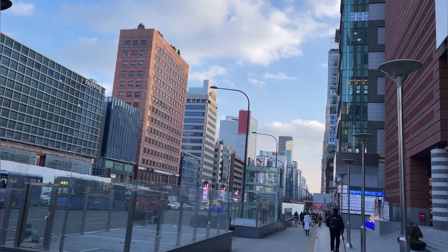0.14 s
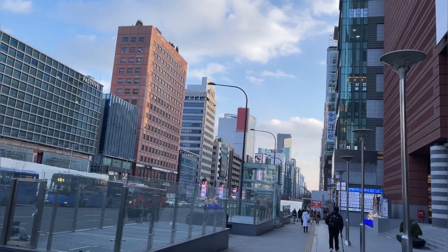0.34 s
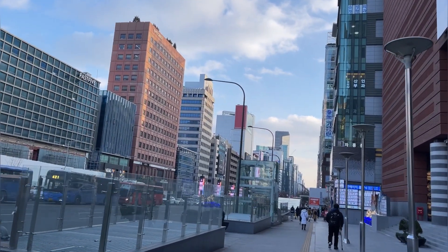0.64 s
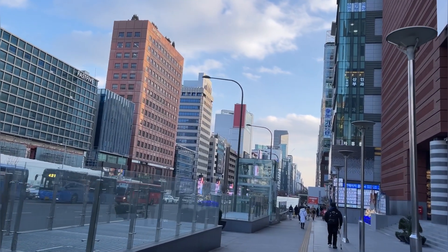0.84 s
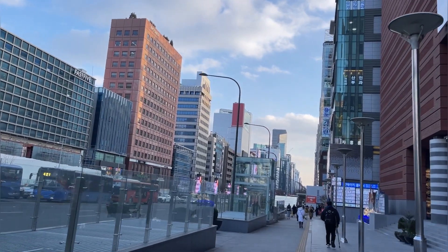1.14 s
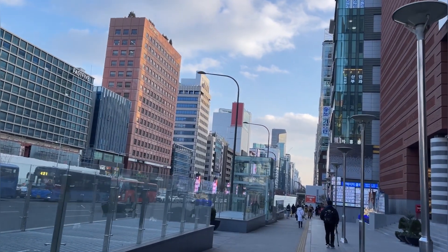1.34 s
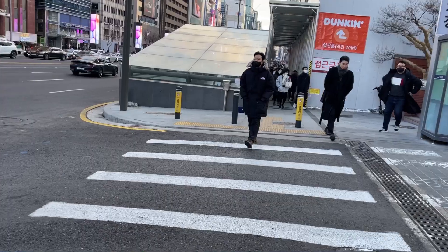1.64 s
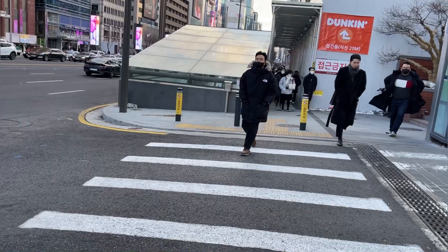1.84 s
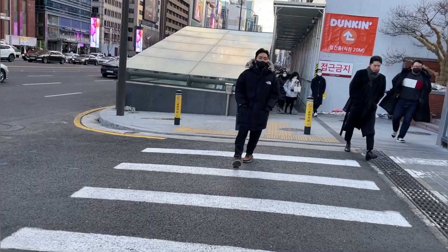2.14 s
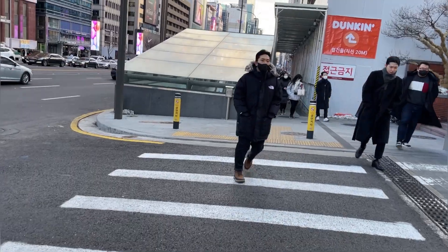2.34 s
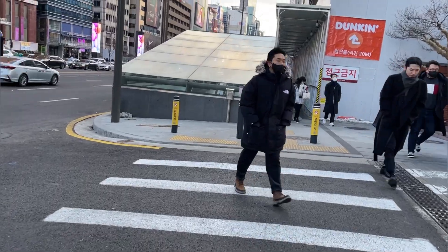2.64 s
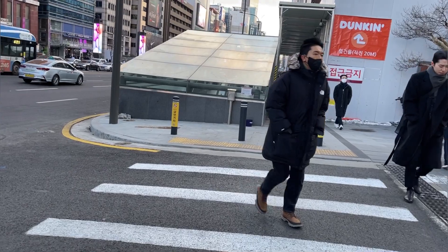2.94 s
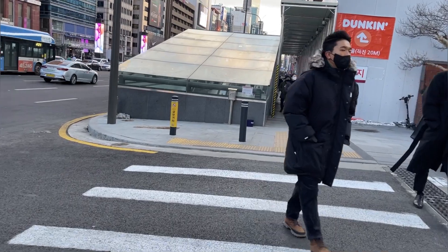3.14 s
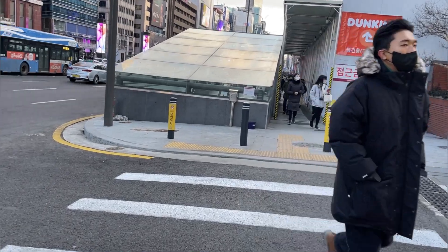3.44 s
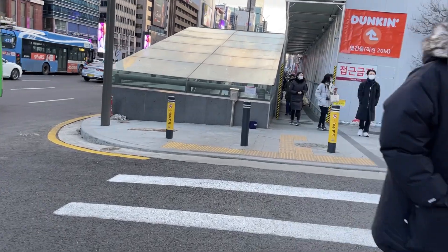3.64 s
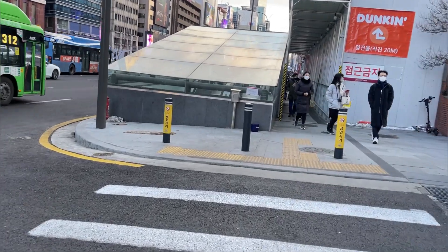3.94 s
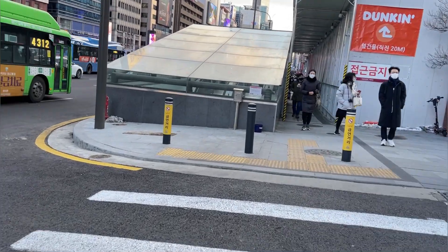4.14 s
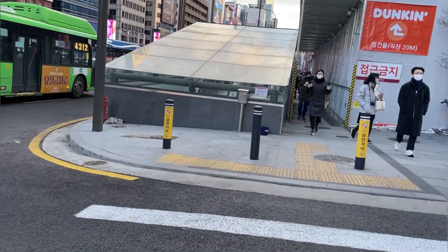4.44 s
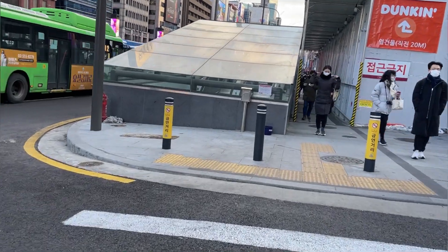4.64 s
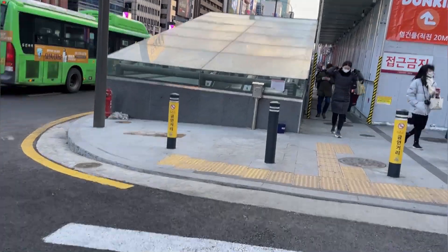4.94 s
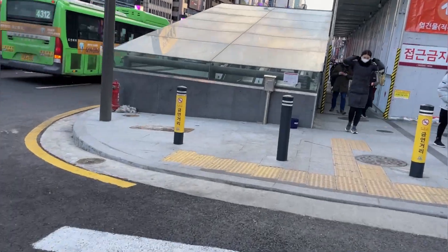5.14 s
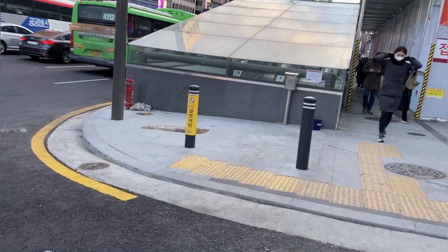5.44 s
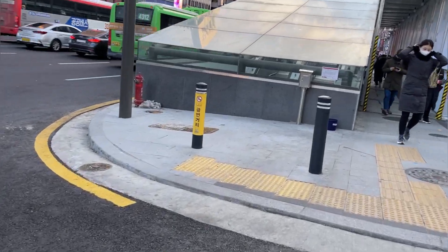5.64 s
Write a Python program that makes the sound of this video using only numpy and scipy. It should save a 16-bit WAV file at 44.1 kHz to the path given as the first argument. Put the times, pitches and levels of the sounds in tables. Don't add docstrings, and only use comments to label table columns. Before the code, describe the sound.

Handheld phone stereo with no wind protection. First, dense wind popping and low buffeting over a blurred traffic wash, with one tiny lull. A hard cut leads to a quieter street corner, where heavy low wind thumps come before a bus swells on the left, its whine sagging in pitch as it goes. A faint metal clink follows, and another car approaches at the end.

```python
import sys
import numpy as np
from scipy import signal
from scipy.fft import rfft, irfft, next_fast_len
from scipy.io import wavfile
from scipy.ndimage import uniform_filter1d

SR = 44100
rng = np.random.default_rng(int(sys.argv[2]) if len(sys.argv) > 2 else 0)


def digitize_waveform(pressure):
    field = np.atleast_2d(pressure).T
    bounded = np.clip(field, -1, 1)
    quanta = np.round(bounded * 32767).astype(np.int16)
    wavfile.write(sys.argv[1], SR, quanta)


def convert_level_to_amplitude(level_db):
    exponent = np.asarray(level_db, float) / 20
    return 10 ** exponent


N = 255780
CHANGE_S = 1.5686
PAD = 1024
SIZE = next_fast_len(N + 2 * PAD)
HZ = np.fft.rfftfreq(SIZE, 1 / SR)


def evened(x):
    return x / np.sqrt(np.mean(abs(x) ** 2) + 1e-20)


def bell(t, s, half):
    return np.exp(-((t - s) / half) ** 2)


def read(points, hz):
    f, value = np.transpose(points)
    return np.interp(np.log(hz + 1), np.log(f + 1), value)


def column(rows, index, t):
    return np.interp(t, np.array(rows)[:, 0], np.array(rows)[:, index])


def spectrum(x):
    padded = np.pad(np.atleast_2d(x), ((0, 0), (PAD, PAD)), "reflect")
    return rfft(padded * signal.windows.tukey(N + 2 * PAD, 2 * PAD / (N + 2 * PAD)), SIZE)


def waveform(z):
    return irfft(z, SIZE)[:, PAD:PAD + N]


def wash(colour, level_db, patchy_db, flicker_db, size, pitch=1, count=N):
    hop = size // 4
    frames, hz = count // hop + 5, np.fft.rfftfreq(size, 1 / SR)
    t = np.arange(frames) * hop / SR
    a, b, c, d, patches = rng.standard_normal((frames, len(hz), 5)).T
    patches = uniform_filter1d(patches, size=size // 100, axis=0)
    patches = evened(uniform_filter1d(patches, size=12000 // size, axis=1))
    flicker = evened(uniform_filter1d(rng.standard_normal(frames), size=3))
    pitch_now = np.interp(t, np.arange(N) / SR, pitch * np.ones(N))
    shape = convert_level_to_amplitude(read(colour, hz[:, None] / pitch_now))
    z = np.array([a + 1j * b, c + 1j * d]) * shape * convert_level_to_amplitude(patchy_db * patches + flicker_db * flicker)
    noise = evened(signal.istft(z, nperseg=size, noverlap=size - hop)[1][:, :count])
    return np.pad(noise, ((0, 0), (0, N - count))) * convert_level_to_amplitude(level_db)


def tone(rows, t, waver, throb_db=0):
    fade_s = 0.011
    wobble = evened(signal.lfilter([1], [1, -.9995], rng.standard_normal(N)))
    throb = uniform_filter1d(rng.standard_normal(N), size=1500)
    throb = evened(uniform_filter1d(throb, size=1500))
    turns = np.cumsum(column(rows, 1, t) * (1 + waver * wobble)) / SR
    edge = np.clip(np.minimum(t - rows[0][0], rows[-1][0] + fade_s - t) / fade_s, 0, 1)
    level = np.sqrt(2) * convert_level_to_amplitude(column(rows, 2, t) + throb_db * throb)
    return level * edge * np.sin(2 * np.pi * turns)


# (frequency [Hz], left leads by [radians])
BODY_LEAD = [(7500, 1.), (8550, 0), (10080, -np.pi), (11700, -2 * np.pi)]
# (frequency [Hz], likeness [0-1])
BODY_SAME = [(8300, .99), (10000, .998)]
# (frequency [Hz], share [0-1])
SHADOWED = [(60, 0), (400, 1), (6000, 1), (8500, 0)]


def ports(a, b, lead, same, left_db):
    def curve(table):
        return np.interp(HZ, *np.transpose(table))

    whole_turns = 2 * np.pi * round(lead[-1][1] / (2 * np.pi))
    turn = curve(lead + [(hz, angle + whole_turns) for hz, angle in BODY_LEAD])
    like = np.clip(curve(same + BODY_SAME), 0, 1)
    own, other = spectrum([a, b])
    right = like * own * np.exp(-1j * turn) + np.sqrt(1 - like ** 2) * other
    both = np.array([own, right])
    shade = convert_level_to_amplitude(np.outer([.5, -.5], left_db)) - 1
    return waveform(both) + shade * waveform(both * curve(SHADOWED))


# (time [s], level [dB])
GUST = [
    (0, -27),
    (.11, -34.5),
    (.27, -23.5),
    (.5, -22.5),
    (.7, -21),
    (.95, -28),
    (1.15, -19.5),
    (1.32, -22),
    (1.5, -26),
]
# (time [s], rattle level [dB], crackle relative to rattle [dB], half length [s])
POPS = [(0.206, -27, -13, .0022), (0.256, -14, -10, 0.0051), (0.272, -15.5, -15, 0.0056),
        (2.594, -17, -24, 0.0032), (0.36, -14, -38, 0.0071), (0.448, -10.5, -36, 0.0035),
        (0.502, -4, -29, 0.0027), (0.543, -7, -26, 0.002), (0.555, -21, -22, 0.0024),
        (0.485, -18, -18, 0.015), (0.645, -12, -23, 0.0045), (0.658, -3, -16.5, 0.0027),
        (0.684, -17, -8, .0019), (0.698, -8.5, -14.5, 0.0016), (0.745, -10, -0.8, 0.0071),
        (0.773, -17.5, -15, 0.0055), (0.811, -22, -14, 0.0022), (0.912, -14, -32, 0.0081),
        (.935, -12.5, -9, 0.0045), (0.957, -18, -13.5, 0.0082), (1.042, -8, -21, 0.0031),
        (1.063, -13, -40, 0.0083), (1.109, -24, -10, 0.0016), (1.232, -18, -16, 0.011),
        (1.268, -17, -20, 0.0061), (1.316, -16.5, -22, 0.017), (1.381, -21, -15, 0.002),
        (1.404, -8, -34, 0.0013), (1.421, -16.5, -36, 0.0066), (1.519, -16, -38, 0.0064)]
# (time [s], level [dB], half length [s])
THUDS = [(0.01, -19, 0.0051), (0.612, -27, 0.003), (1.344, -27, 0.0043), (2.753, -20, .008),
         (0.18, -16.5, 0.0036), (0.296, -12, 0.0017), (0.388, -14.5, 0.0066), (0.419, -18, 0.0041),
         (0.662, -7, 0.0048), (.797, -11, 0.003), (1.132, -14, 0.0083), (1.209, -17, 0.0057),
         (1.447, -13, 0.0071), (2.416, -7.5, 0.0068), (2.593, -4.5, 0.0042), (2.636, -6, 0.0063),
         (2.672, -2.5, 0.0058), (2.698, -4.5, 0.0056), (2.725, -6, .007), (2.768, -4.5, 0.0041),
         (2.797, -13, 0.0063), (1.065, -16, 0.0053), (0.333, -18, 0.0047)]


def eddies(t):
    rattle, body, crackle, lean = np.zeros((4, N))
    when, size = rng.random(40) * (CHANGE_S - .25) + .2, rng.standard_normal(40)
    small = [(s, column(GUST, 1, s) - 4.5 + 4 * z, -18, 0.0029) for s, z in zip(when, size)]
    hits = [(s, db, -20 + 0.96 * (db + 16.5), db + up, half) for s, db, up, half in small + POPS]
    hits += [(s, db - 20, db, -99, half) for s, db, half in THUDS]
    for (s, db, body_db, crackle_db, half), z in zip(hits, rng.standard_normal(len(hits))):
        near = slice(round(max(s - .04, 0) * SR), round((s + .04) * SR))
        now = t[near]
        core, skirt = bell(now, s - .0012, 0.86 * half), bell(now, s + 0.0025, 2.8 * half)
        rattle[near] += convert_level_to_amplitude(db) * (core + 0.22 * skirt)
        body[near] += convert_level_to_amplitude(body_db) * bell(now, s - .0012, 1.4 * half)
        crackle[near] += max(convert_level_to_amplitude(crackle_db) - convert_level_to_amplitude(-62), 0) * bell(now, s - .001, 0.75 * half)
        lean_db = 5.5 + 0.41 * (db + 20.5) + 2 * z
        lean[near] = np.where(abs(now - s) < 3 * half, lean_db, lean[near])
    return rattle, body, crackle, lean


def smear(x, colour, lag_cycles):
    hz = np.fft.rfftfreq(N, 1 / SR)
    response = convert_level_to_amplitude(read(colour, hz)) * np.exp(-2j * np.pi * lag_cycles * np.log(hz + 30))
    return irfft(rfft(x) * response / np.sqrt(np.mean(abs(response) ** 2)), N)


# (time [s], level [dB], brightness relative to level [dB])
JUMPS = [(0.204, -24, -17), (0.238, -19, -16), (0.252, -12, -19), (0.261, -15, -11), (0.269, -16, -16),
         (0.278, -14, -17), (0.296, -27, -19), (0.328, -14, -23), (0.354, -12, -24), (0.362, -11, -25),
         (0.423, -17, -29), (0.449, -14, -24), (0.487, -12, -22), (0.499, -8, -17), (0.528, -10, -23),
         (0.541, -10, -24), (0.558, -16, -26), (0.579, -26, -19), (0.601, -19, -24), (0.635, -13, -23),
         (0.647, -9, -16), (0.655, -8, -17), (0.679, -22, -17), (0.687, -19, -17), (0.696, -16, -13),
         (0.738, -6, -12), (0.743, -9, -15), (0.748, -7, -13), (0.765, -19, -16), (0.809, -23, -15),
         (0.892, -20, -18), (0.908, -14.5, -10), (0.934, -5.5, -12.5), (0.952, -18, -18), (1.041, -13, -20),
         (1.062, -17, -32), (1.107, -15, -23), (1.151, -24, -17), (1.175, -26, -15), (1.205, -19, -17),
         (1.227, -13, -18), (1.244, -16, -21), (1.267, -19, -25), (1.289, -17, -12.5), (1.317, -14, -20),
         (1.338, -20, -19), (1.351, -17, -24), (1.379, -22, -21), (1.404, -11, -28), (1.415, -17, -21),
         (1.444, -17, -16), (1.512, -23, -23), (1.517, -13, -23), (1.541, -18, -19)]
# (time [s], level [dB])
CRACK = (.7425, -14)
# (frequency [Hz], level [dB])
BODY = [(90, 3), (180, 13), (300, 12.5), (480, 7), (900, -39)]
RATTLE = [(250, 1), (600, 8), (1000, 1.5), (1600, -7), (2500, -32), (3500, -51), (8000, -88)]
CRACKLE = [(800, 11), (2200, 12), (3500, -2), (5500, -28), (9000, -43)]
SNAP = [(2200, -1.5), (4000, 7), (5500, -6), (8000, -16), (12000, -12)]


def wind_pops(rattle, body, crackle):
    signs = rng.choice([-1., 1.], (2, N)) * convert_level_to_amplitude(4.7 * rng.standard_normal((2, N)))

    def spray(share):
        x = evened(signs * (rng.random((2, N)) < share))
        return x / np.sqrt(0.2 + abs(uniform_filter1d(x ** 2, size=260)))

    dense, sparse = spray(.06), spray(.025)
    snap = crackle ** 2 * sparse
    rattle, body, crackle = rattle * dense, body * dense, crackle * sparse
    directions = np.outer(rng.choice([-1., 1.], len(JUMPS)), [1, .4])
    for (s, db, up), sign in zip(JUMPS, directions):
        at = round(s * SR)
        rattle[:, at] += sign * convert_level_to_amplitude(db + 13)
        crackle[:, at] += sign * convert_level_to_amplitude(db + up + 15)
        body[:, at] += sign * convert_level_to_amplitude(db + 13)
    crack_s, crack_db = CRACK
    snap[0, round(crack_s * SR)] += convert_level_to_amplitude(crack_db)
    pops = smear(rattle, RATTLE, 1.05) * convert_level_to_amplitude(-3.0)
    pops += smear(body, BODY, 1.1) * convert_level_to_amplitude(-4.5)
    pops += smear(crackle, CRACKLE, 1.05) * convert_level_to_amplitude(1.0)
    return pops + smear(snap, SNAP, 1.2) * convert_level_to_amplitude(1.0)


# (time [s], level [dB], frequency [Hz])
PUSHES = [(0.095, -17.5, 96), (.275, -12, 66.6), (0.347, -9, 110), (0.392, -11, 65), (.509, -10.5, 98),
          (0.558, -13, 74), (.67, -2.5, 75.5), (.691, -6.5, 124), (.786, -7, 75), (.813, -12.5, 72.4),
          (0.974, -11.5, 82.5), (1.052, -12.5, 80), (1.134, -13.5, 71), (1.242, -15, 98), (1.297, -16, 81),
          (1.324, -13, 176), (1.411, -10, 86), (1.468, -8, 80), (1.737, -13, 102), (1.851, -16, 86.5),
          (2.158, -13.5, 86), (2.252, -11.5, 69.6), (2.276, -7, 97), (2.325, -7, 167), (2.382, -4, 70.24),
          (2.454, -11.5, 75.4), (2.527, -6.5, 64), (2.589, -1, 92), (2.639, -5, 100), (2.7, -6.5, 143)]


def air_pushes(t):
    push = np.zeros(N)
    for (s, db, hz), start in zip(PUSHES, rng.random(len(PUSHES))):
        near = slice(round((s - .05) * SR), round((s + .05) * SR))
        cycles = (t[near] - s) * hz
        swing = np.sin(2 * np.pi * (cycles - 0.13 * cycles ** 2 + start))
        push[near] += convert_level_to_amplitude(db) * bell(cycles, 0, 0.77) * swing
    return np.outer([1, .3], push) * convert_level_to_amplitude(-0.3)


# (frequency [Hz], level [dB])
THUMP = [(25, -15), (50, 13), (90, 4), (160, -2), (300, -9), (800, -69)]
POP_COLOUR = [(100, 8), (300, 10), (600, 9.5), (1200, -5), (2000, -16.5), (3500, -32)]


def buffeting(t):
    gust_db, before = column(GUST, 1, t), round(CHANGE_S * SR)
    rumble = wash(THUMP, gust_db, 1.6, 2.3, size=1024, count=before)
    flutter_db = -31 + 0.61 * (gust_db + 27.5)
    return rumble + wash(POP_COLOUR, flutter_db, 0.7, 7.5, size=256, count=before)


# (time [s], frequency [Hz], level [dB rms])
HOWL = [
    (2.5, 77, -22),
    (2.54, 83.9, -19.5),
    (2.6, 99.6, -16),
    (2.64, 110.9, -18.5),
    (2.7, 127.8, -19),
    (2.76, 143.6, -24),
    (2.81, 155, -27),
]


def howl(t):
    octave = [(s, 2 * hz, db) for s, hz, db in HOWL]
    return tone(HOWL, t, 0.0095, throb_db=2.5) + tone(octave, t, 0.0119, throb_db=3.0)


# (time [s], half length [s])
LULL = (.858, .028)
# (frequency [Hz], left leads by [radians])
WIND_LEAD = [(0, 0), (1200, -1.3), (1700, 0), (3000, .9), (6500, .3)]
# (frequency [Hz], likeness [0-1])
WIND_SAME = [(0, 0.53), (600, 0.45), (1400, 0.65), (2800, 0.26), (4300, 0.53), (7000, 0.26)]


def wind(t):
    rattle, body, crackle, lean = eddies(t)
    gusts = wind_pops(rattle, body, crackle) + air_pushes(t) + buffeting(t)
    gusts *= 1 - .95 * bell(t, *LULL)
    gusts[0] += howl(t)
    apart = ports(*gusts, WIND_LEAD, WIND_SAME, 0.61 * uniform_filter1d(lean, size=200))
    return np.where(t < CHANGE_S, apart, gusts[0])


def ducking(loud):
    duck_from_db, duck_share, recover_db_per_s = -16, 0.93, 19
    power_db = 10 * np.log10(abs(uniform_filter1d((loud ** 2).mean(0), size=2000)) + 1e-12)
    rise = np.arange(N) * recover_db_per_s / SR
    held_db = np.maximum.accumulate(power_db + rise) - rise
    over_db = np.maximum(held_db - duck_from_db, 0)
    return convert_level_to_amplitude(-duck_share * uniform_filter1d(over_db, size=400))


# (frequency [Hz], level [dB])
AVENUE = [(30, 30.5), (60, 35), (200, 22), (600, 20.5), (1200, 12.5), (2200, 1.5), (3500, -6), (6000, -4.5),
          (8500, -3), (13000, -5.5)]
# (frequency [Hz], left leads by [radians])
FAR_LEAD = [(0, 0), (250, .1), (950, 1.4), (1640, 4.8), (2410, 6.5), (4000, 6.7), (5000, 7.3), (6500, 6.4)]
# (frequency [Hz], likeness [0-1])
FAR_SAME = [(0, 1), (300, 0.69), (1400, 0.51), (4000, 0.12), (5500, 0.19), (7000, 0.17)]


def avenue(t, gusts):
    traffic = wash(AVENUE, -29.5, 0.98, 0.46, size=1024, count=round(CHANGE_S * SR) + PAD)
    traffic = traffic * ducking(gusts)
    traffic -= .8 * bell(t, *LULL) * uniform_filter1d(traffic, size=24)
    return ports(*traffic, FAR_LEAD, FAR_SAME, 1.3)


# (frequency [Hz], left leads by [radians])
NEAR_LEAD = [(0, 0), (500, 1.7), (1030, 2.9), (2200, 6.3), (3500, 9.3), (3800, 12.9), (5300, 14.8),
             (6800, 12.4)]


def bus_gone(t):
    return np.clip((t - 4.45) / .3 + .5, 0, 1)


def passing(pair, t, same_before, near_db, far_db):
    gone = np.pi / 2 * bus_gone(t)
    near = ports(*pair, NEAR_LEAD, same_before, near_db)
    far = ports(*pair, FAR_LEAD, FAR_SAME, far_db)
    return near * np.cos(gone) ** 2 + far * np.sin(gone) ** 2


# (frequency [Hz], level [dB])
STREET = [(30, -13.5), (60, 14), (100, -3), (250, -7.5), (600, -13), (1100, -15), (2200, -29),
          (3200, -35.5), (6000, -40), (8500, -47.5), (13000, -51)]
# (time [s], frequency [Hz], level [dB], time to fade by 60 dB [s])
TICK = (4.86, 2770, -26, .08)


def crossing(t):
    street = wash(STREET, -22 + 0.12 * (column(BUS, 1, t) + 40), 0.9, 0.97, size=1024)
    coming = convert_level_to_amplitude(0.5 + 14 * np.minimum(t - 5.75, 0))
    street += coming * signal.lfilter(*signal.iirpeak(1100, 1.8, SR), street)
    s, hz, db, t60 = TICK
    age = np.maximum(t - s, 0)
    street[0] += convert_level_to_amplitude(db - 60 * age / t60) * np.minimum(age / .004, 1) * np.sin(2 * np.pi * hz * age)
    return passing(street, t, FAR_SAME, 1.9, 1.0)


# (time [s], nearness [dB], engine effort [dB])
BUS = [(1.6, -53, -24.5), (1.78, -48, -22.5), (2.0, -44.5, -25.5), (2.3, -43, -20.5), (2.6, -40, -16.5),
       (2.85, -36, -18), (3.15, -33.5, -15.5), (3.45, -31.5, -14), (4.05, -31, -14), (4.25, -32.5, -14.5),
       (4.4, -39, -22.5), (5.0, -41, -24.5), (5.8, -46.5, -34)]
# (frequency [Hz], level [dB])
ROAR = [(30, -31), (60, -4), (130, -1), (250, 2.5), (400, -6), (800, -9.5), (1200, -19.5), (2000, -40)]
TYRES = [(600, -15), (1100, -13), (1500, 1.5), (2100, 0.5), (2600, -6), (3200, -13.5), (3800, -21),
         (4500, -13.5), (5300, -21.5), (7000, -27)]
FAN = [(4500, -23), (6600, -8), (7300, -4.5), (7900, -1), (8700, -3), (11000, -7.5), (14000, -5.5)]
# (time [s], pitch factor)
FAN_PITCH = [(2.6, .94), (3.5, 1.), (4.2, 1.1), (4.6, 1.15)]
# (time [s], frequency [Hz], level [dB rms])
WHINE = [(1.6, 263.8, -50), (1.72, 264.3, -23), (2.06, 264.2, -37), (2.36, 265.8, -24.5), (3.0, 269, -24),
         (3.72, 266, -24.5), (3.9, 269, -20), (4.0, 266, -14), (4.138, 258.1, -15.5), (4.264, 237.2, -15),
         (4.33, 211, -26), (4.42, 201.5, -23), (4.53, 197, -24)]
# (start [s], end [s], frequency [Hz], level [dB rms], waver [share])
TONES = [(2.7, 3.55, 62.5, -14.5, 0.0088), (3.58, 3.92, 63.2, -19, 0.013), (3.3, 3.92, 230, -22.5, 0.0296),
         (5.6, 5.8, 3700, -60, 0.0038), (3.7, 4.02, 89.4, -25.5, 0.0049), (4.5, 5.24, 91.5, -23, 0.0067),
         (5.33, 5.72, 92, -25.5, 0.0056), (2.45, 3.1, 533, -36, 0.00604), (4.28, 4.38, 68, -19, 0.011),
         (4.5, 4.76, 65, -23.5, .01), (4.61, 4.89, 197, -24.5, .008), (4.99, 5.23, 195, -25.5, 0.0092),
         (5.3, 5.85, 195, -27, .008), (4.5, 5.4, 47.4, -31, .012), (5.2, 5.72, 2230, -49.5, 0.0044)]
# (frequency [Hz], likeness [0-1])
NEAR_SAME = [(0, 1), (500, 0.61), (2200, 1), (3600, 0.2), (4400, 1), (5500, 0), (6500, 0.83)]


def bus(t):
    near_db, effort_db = column(BUS, 1, t), column(BUS, 2, t)
    fan_db = -44 + 0.86 * (near_db + 40) + 3.5 * bus_gone(t)
    noise = wash(ROAR, effort_db - 1.5, 1.73, 0.22, size=1024)
    noise += wash(TYRES, near_db + 2.0, 0.58, 0.21, size=512)
    noise += wash(FAN, fan_db, 0.44, .8, size=512, pitch=column(FAN_PITCH, 1, t))
    noise += wash(THUMP, -26, 1.7, 1.8, size=1024)
    engine = tone(WHINE, t, 0.005, throb_db=1.5)
    for start, end, hz, db, waver in TONES:
        engine += tone([(start, hz, db), (end, hz, db)], t, waver)
    return passing(noise + np.outer([1, .3], engine), t, NEAR_SAME, 1.6, 1.0)


def scene():
    t = np.arange(N) / SR
    gusts = wind(t)
    return gusts + np.where(t < CHANGE_S, avenue(t, gusts), crossing(t) + bus(t))


# (frequency [Hz], level [dB])
MICROPHONE = [(20, -26), (35, -8), (55, 0), (9000, 0), (10300, 5), (11300, -1), (11900, -8), (12300, -19),
              (12480, -90)]


def microphone(dry):
    heard = waveform(spectrum(dry) * convert_level_to_amplitude(read(MICROPHONE, HZ)))
    return .98 * np.tanh(heard / .98)


def low_pass(x):
    return signal.sosfilt(signal.butter(12, 12570, fs=SR, output="sos"), x)


def record(dry):
    t = np.arange(N) / SR
    limited = microphone(dry)
    close = np.exp(-abs(CHANGE_S - t) / .004)
    before = limited * (1 - close) - .09 * np.outer([1.3, .7], close)
    after = limited * np.clip((t - CHANGE_S) / .022, 0, 1)
    return low_pass(np.where(t < CHANGE_S, before, after))


dry = scene()
out = record(dry)
digitize_waveform(out)
```